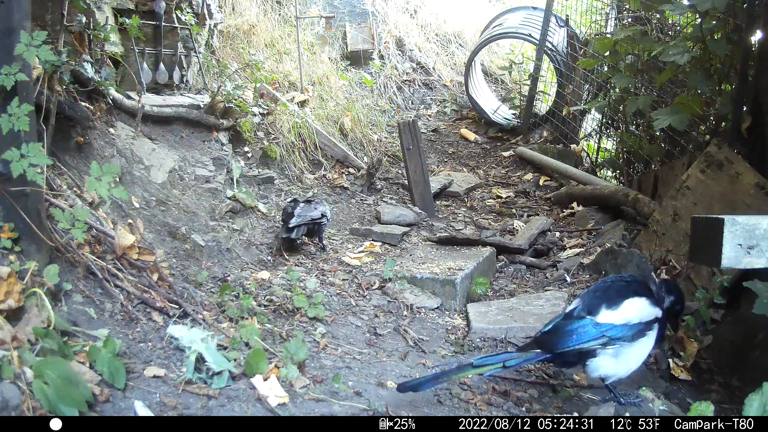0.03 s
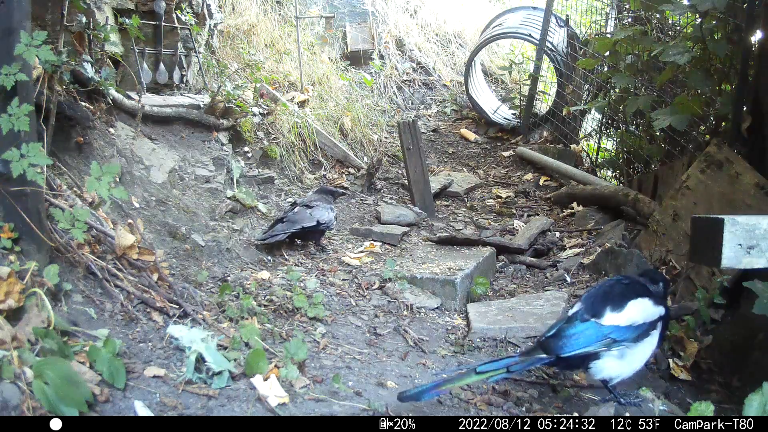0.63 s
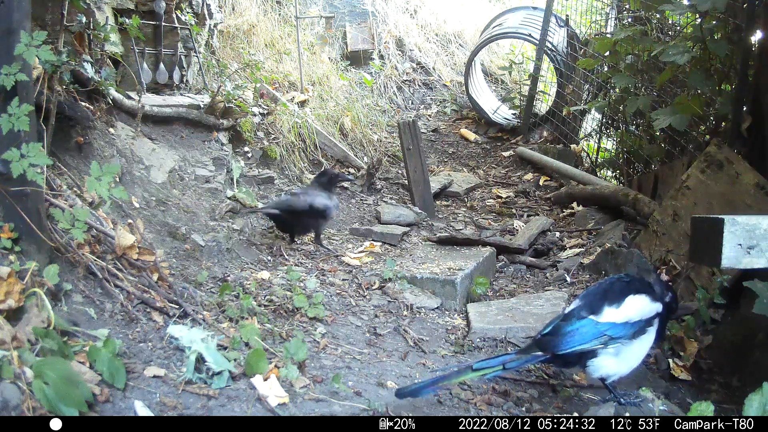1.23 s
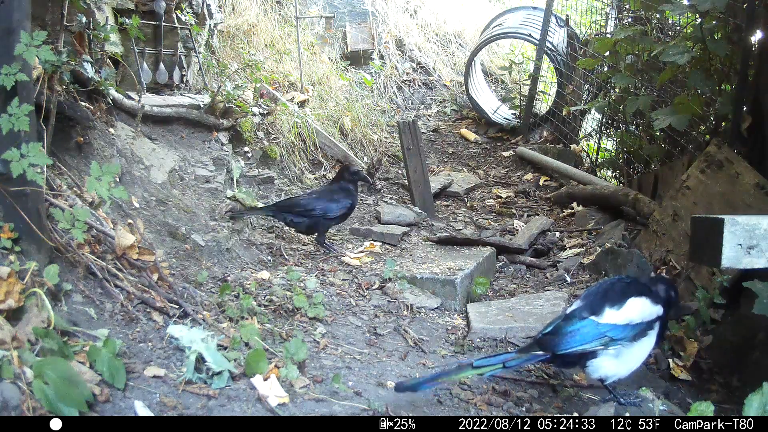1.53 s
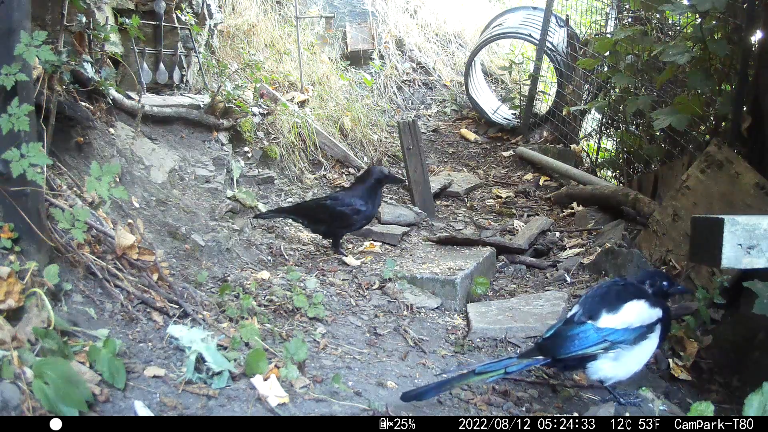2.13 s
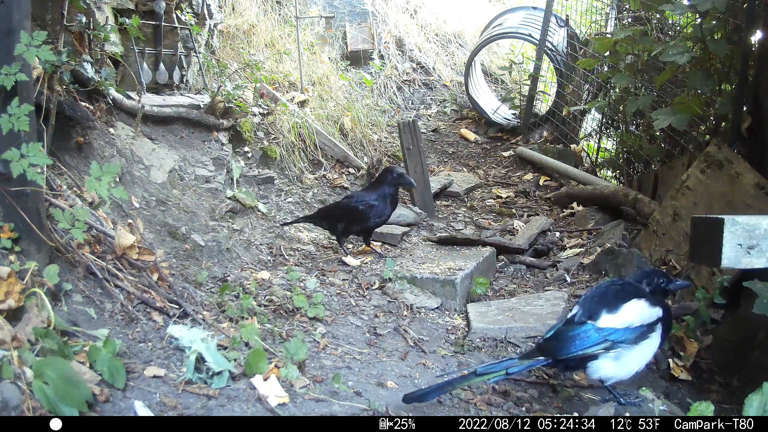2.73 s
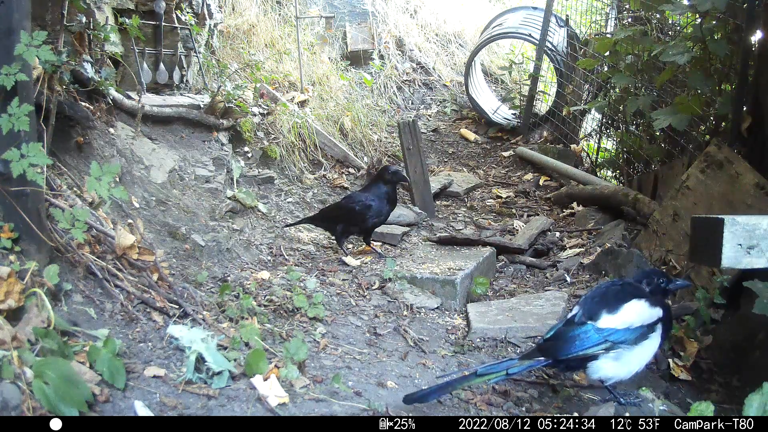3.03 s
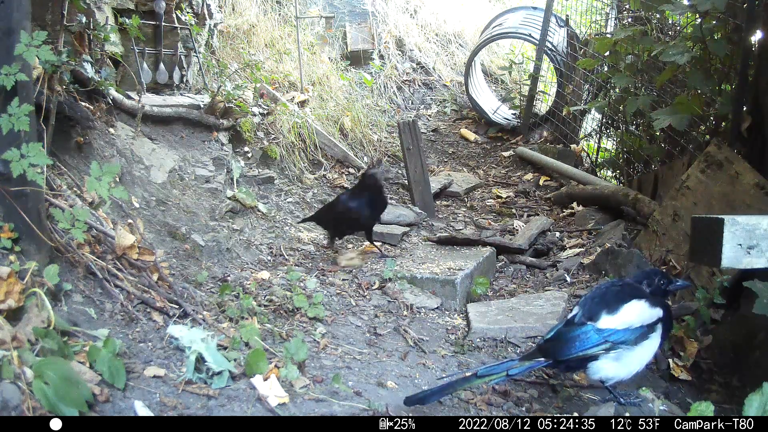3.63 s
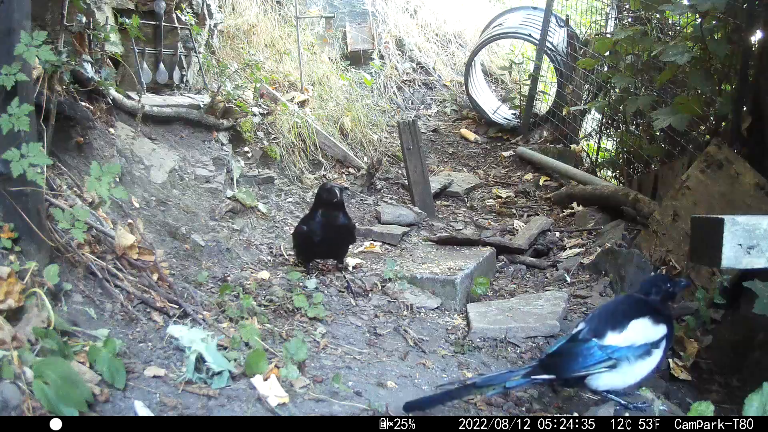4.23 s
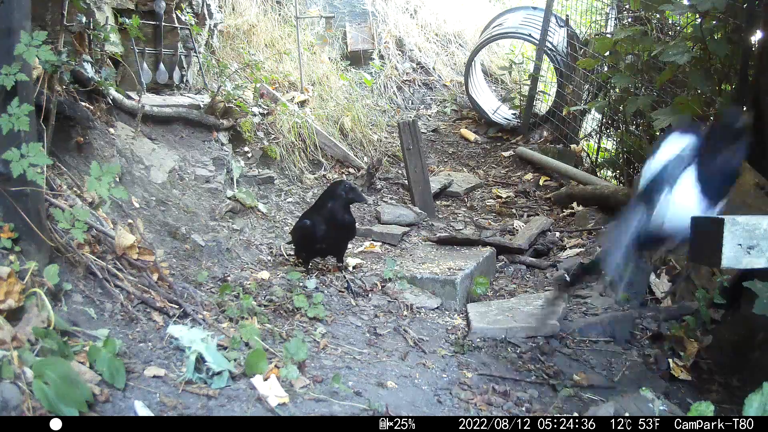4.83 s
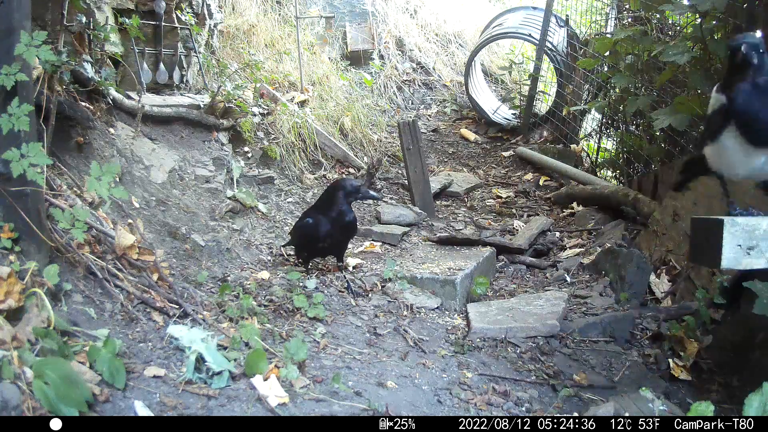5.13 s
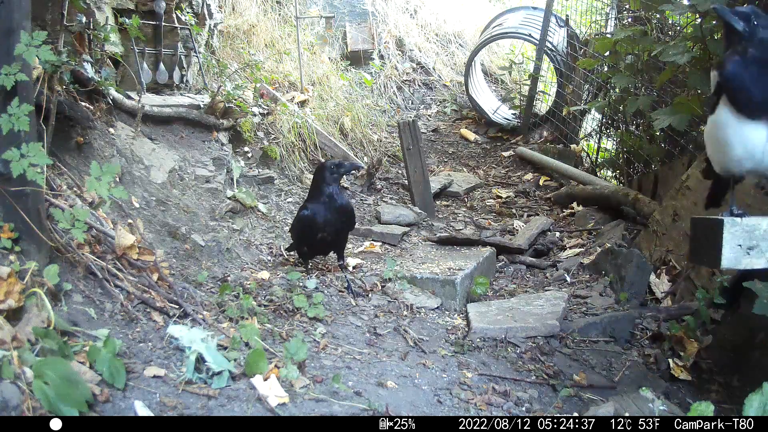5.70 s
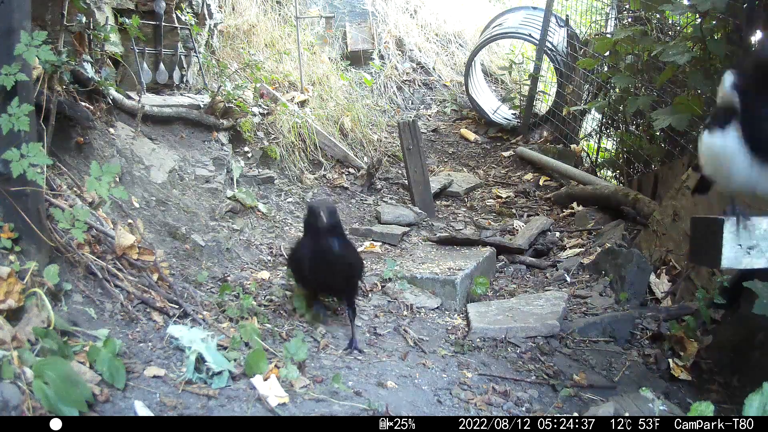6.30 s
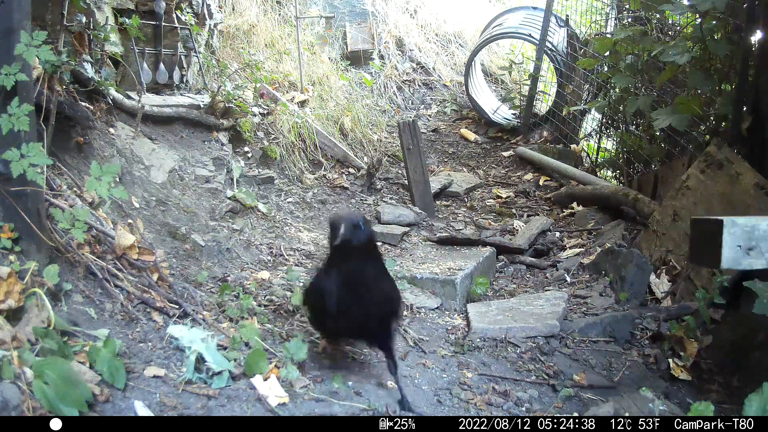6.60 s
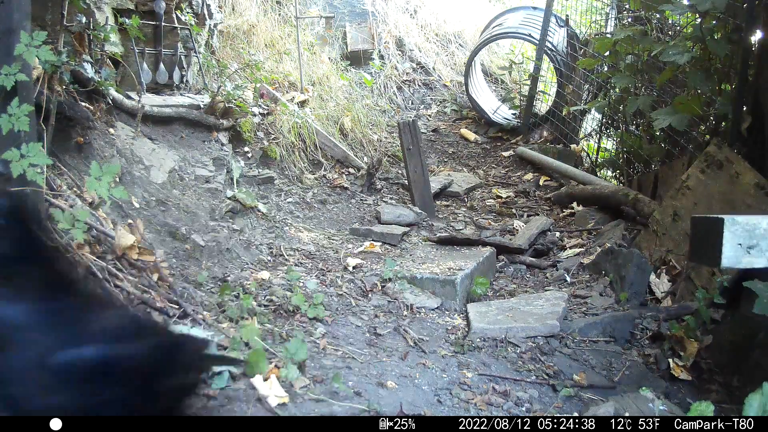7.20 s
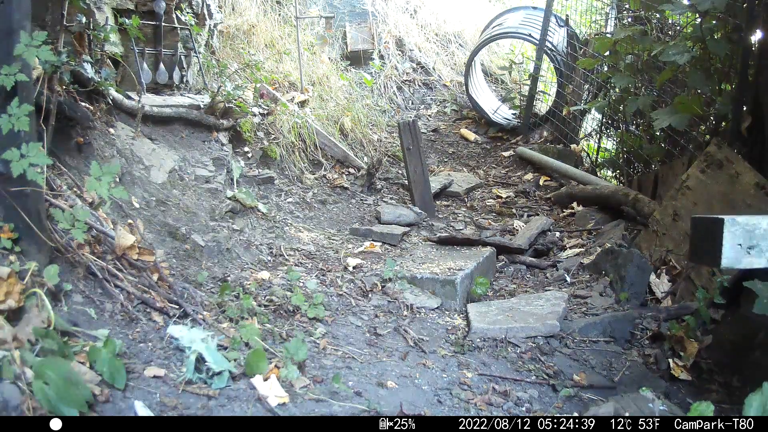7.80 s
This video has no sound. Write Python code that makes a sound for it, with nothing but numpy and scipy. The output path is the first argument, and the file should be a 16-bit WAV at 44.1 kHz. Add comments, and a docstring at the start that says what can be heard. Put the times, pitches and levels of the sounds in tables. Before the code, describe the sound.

Distant traffic hums steadily behind a garden where a few birds give quiet, brief falling calls between light pecks, steps and leaf scuffs. The hum swells once, then three raspy squawks ring off the walls. Claws click closer and closer until a sharp twig crack sets off the loudest sound, a quick flurry of wingbeats very near the microphone, buffeting it with air and ending on a short squawk.

```python
"""Magpies and a crow call and forage in a walled garden: short falling notes, then three harsh squawks.
Each voice is a buzzing tone from the bird's voice box (the syrinx), shaped by its throat.
Claws and beaks tick, twigs snap and feet scuff in dry leaves. At the end a bird flaps off very close by:
its feathers crackle and puffs of air hit the microphone. Faint birds call far away, and distant
traffic hums under it all."""
import sys
import numpy as np
from scipy import signal
from scipy.fft import rfft, irfft, next_fast_len
from scipy.io import wavfile
from scipy.ndimage import uniform_filter1d

SR = 44100
rng = np.random.default_rng(int(sys.argv[2]) if len(sys.argv) > 2 else 0)


def log_audio(samples):
    """Write samples as a 16-bit WAV file to the path given in sys.argv[1]."""
    # one column per channel
    frames = np.atleast_2d(samples).T
    # limit to full scale, then quantise
    limited = np.clip(frames, -1, 1)
    pcm = np.round(limited * 32767).astype(np.int16)
    wavfile.write(sys.argv[1], SR, pcm)


N = 355049
TIME = np.arange(N) / SR
CUTOFF_HZ = 15900

# Squawking voices; where two overlap, both sides of the syrinx sound. Each row: start, rise time and
# length in seconds, pitch before and after the dive in Hz, dive time in seconds, level in dB,
# seconds until the voice breaks, final roughness from 0 to 1.
SQUAWK_VOICES = [(5.339, 0.13, 0.22, 1563, 1466, 0.038, -38, 0.057, 0.88),
                 (5.393, 0.024, .15, 1730, 1175, 0.047, -41.5, .008, 0.65),
                 (5.718, 0.12, 0.24, 1500, 1557, 0.069, -38.5, 0.056, 0.9),
                 (5.733, 0.073, 0.19, 2225, 1440, 0.055, -40.5, 0.024, 0.46),
                 (6.109, 0.02, 0.13, 2400, 1540, 0.038, -44.5, 0.016, .52),
                 (6.093, 0.022, 0.06, 2520, 2500, 0.097, -46.5, 0.061, 0.3),
                 (6.127, 0.035, 0.18, 1810, 1457, 0.063, -45, 0.011, 0.94),
                 (8.011, 0.0066, 0.054, 2446, 2090, 0.067, -32, .025, 0.46)]
# One throat for each voice above. Each resonance: centre in Hz, half width in Hz, level in dB.
SQUAWK_RESONANCES = [
    [(1500, 1600, -21), (2900, 260, -.5), (4920, 350, -3), (6650, 260, -1), (8600, 990, -7.5)],
    [(2270, 130, -5), (2890, 320, -2.5), (5000, 400, -4.5), (7200, 1600, -7)],
    [(2470, 230, -4.5), (3130, 450, -0.5), (5300, 140, -4), (7100, 820, -7), (9100, 1300, -15)],
    [(1880, 220, -21), (2980, 270, 1), (5130, 180, 2), (7600, 1200, -6)],
    [(2150, 330, -1), (3300, 220, -4), (5600, 220, -5), (7150, 1000, -5)],
    [(2500, 370, 6), (5100, 400, -20)],
    [(2400, 170, 3.5), (3080, 470, 3), (5800, 220, -3), (6800, 460, -2), (8600, 1400, -8)],
    [(2400, 500, 2), (4900, 600, -14)],
]
# Short notes. Each row: start and length in seconds, first pitch in Hz, level in dB, roughness near
# the middle from 0 to 1, brightness in dB per octave, boost of the upper throat resonance in dB.
FALLING_NOTES = [(0.582, 0.054, 1089, -53.5, 0.35, 0.5, -7), (0.941, 0.057, 1075, -49.5, 0.3, 2.5, 7),
                 (1.937, 0.06, 1014, -54, 0.17, -0.5, -1), (3.484, 0.06, 1082, -49.5, 0.28, 0.5, -1),
                 (6.383, 0.048, 1120, -50, 0.3, 2, 2), (6.684, 0.05, 1120, -48.5, 0.26, 1, 2),
                 (7.542, 0.054, 1102, -48, 0.3, 2.5, -4)]
# The throat that shapes those notes. Each row: frequency in Hz, level in dB.
NOTE_THROAT_COLOUR = [(500, -38), (900, -6.5), (1060, 0), (1350, -16), (1900, 2.5), (2150, -4.5),
                      (2500, -22), (2880, -9.5), (3300, -14), (4200, -17.5), (5000, -11), (6000, -16.5),
                      (7000, -16), (11000, -30)]

# Wing strokes; the first only brushes past. Each row: peak time and half width in seconds, level in dB.
WING_STROKES = [(7.135, 0.023, -45.5), (7.699, 0.0085, -26), (7.783, 0.028, -29.5), (7.8135, 0.007, -20.5),
                (7.836, 0.0038, -29), (7.872, 0.0038, -24.5), (7.89, 0.012, -28.5), (7.917, .006, -26),
                (7.943, 0.0093, -26), (7.975, 0.01, -22), (8.015, 0.028, -31)]
# The tone of rustling feathers. Each row: frequency in Hz, level in dB.
FEATHER_TONE = [(240, -44), (400, -3.5), (826, -4), (1040, -1), (1160, -6), (1290, -4), (2840, -2.5),
                (3900, -1.5), (4280, 4.5), (4750, -1), (5250, 1.5), (5800, -1), (8500, 0), (9300, 0),
                (10000, -4), (13300, -6), (16000, -15)]
# Stiff quills snapping against each other. Each row: start in seconds, peak in dB, centre in Hz.
QUILL_SNAPS = [(7.7295, -17, 7500), (7.7495, -14, 11500), (7.777, -7, 11000), (7.782, -16, 10000),
               (7.7932, -1.5, 9100), (7.818, -14, 4870), (7.834, -14, 11000), (7.8723, -5, 4800),
               (7.893, -16, 9000), (7.9293, -4, 8100), (7.931, -6.5, 4350), (7.939, -6, 7000),
               (7.9422, -7, 9800), (7.9435, -4, 5000), (8.015, -8, 7600)]
# Air from the wings. Each row: peak time and half width in seconds, level in dB, top frequency in Hz.
AIR_PUFFS = [(7.807, 0.0074, -20, 100), (7.836, 0.014, -21.5, 95), (7.841, 0.0032, -21, 300),
             (7.914, 0.015, -33.5, 169), (7.965, 0.005, -24, 305), (7.99, 0.023, -35.5, 80.5)]

# Claws and beaks on twigs and stone. Each row: start in seconds, level in dB, centre in Hz,
# fade time in seconds.
CLAW_TICKS = [(.311, -41.5, 5800, 0.018), (1.476, -45.5, 6360, .0046), (1.653, -53, 4020, .004),
              (3.646, -47, 6000, 0.0032), (3.822, -46.5, 6600, .0044), (3.866, -48, 3770, .0037),
              (3.937, -45, 10500, .004), (3.964, -42, 8500, .0059), (4.100, -45, 6450, 0.0047),
              (4.202, -45, 5540, .003), (4.441, -47.5, 3500, 0.0038), (4.964, -46.5, 4640, 0.014),
              (5.148, -47.5, 3870, 0.0052), (5.340, -40, 3700, 0.0021), (6.522, -44, 4100, .004),
              (6.7355, -37, 5460, .003), (6.7372, -25, 1470, 0.007), (6.7385, -22.5, 3900, 0.0024),
              (6.749, -40, 6500, .0012), (6.754, -33, 6200, .0012), (6.794, -39, 6000, 0.0057),
              (6.890, -31.5, 4230, .004), (6.896, -29.5, 6200, 0.011), (6.966, -44, 5000, .003),
              (6.972, -34.5, 5000, 0.009), (7.098, -35, 3970, .0048), (7.165, -27, 5600, 0.0048),
              (7.269, -29, 4870, .0013), (7.278, -35, 4870, 0.01), (7.3075, -19.5, 5100, 0.0014),
              (7.3094, -15.5, 5700, 0.00075), (7.315, -28.5, 8500, 0.003), (7.4264, -26.5, 4770, 0.0044),
              (7.4385, -24, 4800, 0.00054), (7.4404, -22.5, 5600, 0.0011), (7.455, -27, 4520, 0.00096),
              (7.479, -34, 4900, .00083), (7.487, -25, 5100, 0.00082), (7.495, -33, 5200, 0.00092),
              (7.535, -29, 5100, 0.00097), (7.556, -35, 5000, 0.0009), (7.6864, -1.5, 5000, 0.0015)]
# Brittle twigs. Each row: start in seconds, level in dB, pitch in Hz, rise and fade times in seconds.
TWIG_SNAPS = [(4.0985, -42, 4760, .001, 0.0046), (7.3088, -26, 5100, 0.00079, 0.00069),
              (7.4398, -24, 5000, 0.00044, 0.00079), (7.6865, -1.5, 5250, 0.00071, 0.00032),
              (7.6865, -17, 1420, 0.00076, 0.00082)]
# The ringing tones of a chip of stone. Each row: pitch in Hz, level in dB, seconds to fade by 60 dB.
STONE_TONES = [(780, -8, 0.016), (1820, -18.5, 0.049), (2060, -21, .04), (3800, 3, 0.0057),
               (6960, 1.5, 0.0068), (8200, -19, 0.017)]
# The crow's steps on a piece of wood. Each row: start in seconds, level in dB.
WOOD_STEPS = [(0.309, -54), (3.80, -53), (3.894, -44.5), (3.942, -52), (4.004, -50), (4.059, -49.5),
              (4.099, -52.5), (4.133, -43), (4.272, -54), (4.442, -54)]
# The ringing tones of that wood. Each row: pitch in Hz, level in dB, seconds to fade by 60 dB.
WOOD_TONES = [(1120, 1, 0.031), (1500, 1, 0.022), (1795, 0.5, 0.029), (2900, -1, 0.017), (3600, -7, 0.038),
              (4800, -4.5, .034), (6900, -5, .012)]
# Heavier landings. Each row: start in seconds, level in dB, top frequency in Hz, fade time in seconds.
LANDINGS = [(0.308, -45.5, 547, 0.012), (6.737, -32.5, 410, 0.021)]
# Feet in dry leaves. Each row: start and length in seconds, level in dB, boost of the top treble in dB.
LEAF_SCUFFS = [(1.873, 0.054, -59.5, 3), (3.057, 0.046, -65, 1), (3.654, 0.51, -66.5, 8),
               (3.704, 0.048, -55, 3), (3.9, 0.075, -61, 12), (4.04, 0.023, -63, 3),
               (6.332, 0.061, -59, 10), (6.616, 0.77, -62.5, 9), (7.076, 0.073, -54, 13),
               (7.614, 0.11, -36, -21)]
# The tone of the scuffing rustle, with its top treble turned down. Each row: frequency in Hz, level in dB.
SCUFF_TONE = [(300, -21), (1000, 2.5), (1800, 0), (2500, -0.5), (3700, 5.5), (5000, -1.5), (7700, 3.5),
              (10000, -11), (16000, -22)]

# A small bird far away. Each row: start and length in seconds, first pitch in Hz, level in dB.
FAR_WHISTLES = [(4.158, 0.26, 4340, -74), (4.42, 0.19, 4080, -76), (4.66, 0.2, 4060, -77)]
# Hoarse calls beyond the wall. Each row: start and length in seconds, level in dB, middle pitch in Hz.
CAWS = [(2.635, 0.053, -71.5, 1156), (2.96, 0.18, -72, 2690), (3.14, .05, -70, 1550),
        (3.26, .06, -71, 1540), (4.722, 0.19, -68, 2200)]
# The throat that shapes those calls. Each row: multiple of the middle pitch, level in dB.
CAW_THROAT = [(.4, -24), (.75, -4), (1, -5), (1.3, -9), (3, -17)]
# The tones of the traffic and of the hiss. Each row: frequency in Hz, level in dB.
TRAFFIC_TONE = [(15, -69), (25, -13), (86, -6), (107, -4.5), (177, -6), (216, 1), (262, -4.5), (350, -3.5),
                (426, -16.5), (525, -20.5), (560, -27.5), (659, -25), (840, -28), (1040, -34.5),
                (1200, -54), (1560, -66), (2640, -120)]
HISS_TONE = [(530, -16), (900, -8), (1160, -0.5), (1570, -3), (3380, -7.5), (4010, -7), (5100, -6.5),
             (14200, -10), (16000, -17)]


def squawks(clean_roughness=0.12, break_width_s=0.0116, sag_hz_per_s=900, rattle_hz=115.1):
    """Each voice opens as an almost clean whistle, then breaks into a sputtering rasp."""
    out = np.zeros(N)
    for row, throat in zip(SQUAWK_VOICES, SQUAWK_RESONANCES):
        start, attack, length, first_hz, last_hz, dive_s, db, break_s, roughness = row
        age = np.arange(int(length * SR)) / SR
        fade = np.clip((length - age) / (0.52 * length), 0, 1) ** 1.24
        swell = np.clip(age / attack, 0, 1) * fade
        dive = np.exp(-(age / dive_s) ** 1.6)   # lingers, then moves fast
        pitch_hz = last_hz + (first_hz - last_hz) * dive - sag_hz_per_s * age
        broken = 1 / (1 + np.exp((break_s - age) / break_width_s))
        rough = clean_roughness + (roughness - clean_roughness) * broken
        voice = syrinx(pitch_hz, rough, jitter=.085 * rough, wobble=.055, rasp=.28, purity=1.4)
        rattle = np.cos(phase_of(rattle_hz * (1 + 0.28 * low_noise(110, len(age)))))
        voice *= 1 + .55 * rough * rattle
        add(out, start, from_db(db) * swell * even(sinking_throat(voice, throat), size=600))
    return out


def notes(fall_share=.24, hoarseness=0.59, upper_hz=2900, upper_width_hz=320):
    """Each short note swells and fades while its pitch slides down and the voice frays."""
    out = np.zeros(N)
    hz, throat_db = np.transpose(NOTE_THROAT_COLOUR)
    for start, length, first_hz, db, roughness, bright_db, boost_db in FALLING_NOTES:
        progress = np.linspace(0, 1, round(length * SR))
        pitch_hz = first_hz * (1 - fall_share * progress ** 1.55)
        rough = roughness * (.4 + 1.3 * progress)
        voice = syrinx(pitch_hz, rough, jitter=.09, wobble=.06, rasp=.7, purity=.2)
        voice *= 1 + hoarseness * (.4 + progress) * low_noise(170, len(progress))
        tilt_db = bright_db * np.log2(hz / first_hz)
        upper_db = boost_db / (1 + ((hz - upper_hz) / upper_width_hz) ** 2)
        voice = colour(voice, np.c_[hz, throat_db + tilt_db + upper_db])
        add(out, start, from_db(db) * np.sin(np.pi * progress) * even(voice, size=600))
    return out


def syrinx(pitch_hz, rough, jitter, wobble, rasp, purity):
    """The voice box makes a stack of overtones; the rougher it is, the brighter, shakier and airier."""
    n = len(pitch_hz)
    quiver = (.007 + jitter * rough) * low_noise(450, n)
    lurch = wobble * rough * low_noise(90, n)
    phase = phase_of(pitch_hz * (1 + quiver + lurch))
    slope = purity * (1 - np.clip(rough, 0, 1))
    stack = sum(np.cos(k * phase) / k ** slope * (k * pitch_hz < CUTOFF_HZ) for k in range(1, 11)) / 2
    doubling = 0.18 * np.cos(phase / 2)   # every other cycle is stronger
    strength = 1 + rough * (0.89 * low_noise(600, n) + doubling)
    air = rasp * rough * rng.standard_normal(n) * (1 + np.cos(phase))   # one rasp in each cycle
    return stack * strength + air


def sinking_throat(voice, throat, fall_share=0.09, wander=.035, valley_db=-28, shapes=12):
    """The throat's resonances waver and slide down as it blends from one shape to the next."""
    out, hz = 0, np.geomspace(200, CUTOFF_HZ, 200)
    # a small beak lets out neither bass nor the highest treble
    beak = 1 / np.hypot(1, (hz / 11000) ** 5) / np.hypot(1, (1000 / hz) ** 2)
    stage = np.linspace(0, shapes - 1, len(voice))
    for k, sink in enumerate(fall_share * np.linspace(.5, -.5, shapes)):
        shifts = sink + wander * rng.standard_normal(len(throat))
        gain = from_db(valley_db)
        for (centre, width, db), shift in zip(throat, shifts):
            moved_hz = centre * (1 + shift * min(1, (3000 / centre) ** 2))   # low ones move most
            gain = gain + from_db(db) / (1 + ((hz - moved_hz) / width) ** 2)
        blend = np.maximum(1 - np.abs(stage - k), 0)
        out += blend * colour(voice, np.c_[hz, 20 * np.log10(gain * beak)])
    return out


def wings(flutter_db=-33.5, takeoff_s=7.69, rise_s=0.09):
    """Each stroke is a swell of feather noise; after take-off the feathers also rustle in between."""
    flutter = from_db(flutter_db) * np.clip((TIME - takeoff_s) / rise_s, 0, 1)
    power = flutter ** 2 + sum((from_db(db) * bell(s, width)) ** 2 for s, width, db in WING_STROKES)
    return np.sqrt(power) * rustle(FEATHER_TONE, grains_per_s=7000, swish=1.0)


def quills(barbs_per_s=9000, barb_db=-4, fade_s=0.0013, broad_db=-9):
    """A quill snaps and drags a dying run of tiny barb slips after it, coloured by the shaft."""
    out, age = np.zeros(N), np.arange(512) / SR
    grid = (len(QUILL_SNAPS), len(age))
    for (start, db, hz), luck, size in zip(QUILL_SNAPS, rng.random(grid), rng.standard_normal(grid)):
        slips = from_db(barb_db) * size * (luck < barbs_per_s / SR) * np.exp(-age / fade_s)
        slips[0] = 1   # the snap itself
        shaft = signal.lfilter(*signal.iirpeak(hz, Q=2.4, fs=SR), slips)
        snap = shaft + from_db(broad_db) * np.diff(slips, prepend=0) / 2
        add(out, start, from_db(db) * snap / np.abs(snap).max())
    return out


def puffs():
    """The wings push lumps of swirling air over the microphone."""
    return sum(from_db(db) * bell(s, width) * even(low_noise(hz, order=5), size=800)
               for s, width, db, hz in AIR_PUFFS)


def ticks(band_ratio=1.42, broad_db=-8.5, crumble_db=-20.5, crumble_s=0.011, attack_s=0.0001):
    """A claw or beak strikes: a short crack, strongest in one band, with a crumbling tail."""
    out, age = np.zeros(N), np.arange(4096) / SR
    for start, db, hz, fade_s in CLAW_TICKS:
        grit = rng.standard_normal((2, len(age)))
        band = filtered(grit[0], 4, [hz / band_ratio, min(hz * band_ratio, CUTOFF_HZ)], "band")
        broad = filtered(grit[1], 4, [min(800, hz / 2), min(hz * np.sqrt(2), CUTOFF_HZ)], "band")
        crack = even(band + from_db(broad_db) * broad, size=48)
        fade = np.exp(-np.maximum(age - attack_s, 0) / fade_s)
        crumble = from_db(crumble_db) * np.exp(-age / crumble_s)
        add(out, start, from_db(db) * crack * np.minimum(age / attack_s, 1) * (fade + crumble) / 2)
    return out


def twigs():
    """A twig cracks within a millisecond and rings very briefly at one pitch."""
    out, age = np.zeros(N), np.arange(SR // 20) / SR
    for start, db, hz, rise_s, fade_s in TWIG_SNAPS:
        shape = np.minimum(age / rise_s, 1) ** 2 * np.exp(-np.maximum(age - rise_s, 0) / fade_s)
        add(out, start, from_db(db) * shape * np.sin(2 * np.pi * hz * age))
    return out


def peck(start_s=.3089, level_db=-29, attack_s=0.00046):
    """One hard peck makes a chip of stone clink."""
    out, age = np.zeros(N), np.arange(SR // 10) / SR
    clink = sum(ring(age, hz, level_db + db, ring_s) for hz, db, ring_s in STONE_TONES)
    add(out, start_s, clink * np.minimum(age / attack_s, 1))
    return out


def knocks(uneven_db=2, scrape_db=-7, scrape_s=0.0094, attack_s=0.0034):
    """Each step scrapes the wood and loads it differently, so it rings with new pitches and strengths."""
    out, age = np.zeros(N), np.arange(4096) / SR
    chances = rng.standard_normal((len(WOOD_STEPS), len(WOOD_TONES), 2))
    for (start, db), chance in zip(WOOD_STEPS, chances):
        scrape = rms_one(filtered(rng.standard_normal(len(age)), 2, [900, 5000], "band"))
        step = from_db(scrape_db) * np.exp(-age / scrape_s) * scrape
        for (hz, tone_db, ring_s), (luck, load) in zip(WOOD_TONES, chance):
            step += ring(age, hz * (1 + .025 * load), tone_db + uneven_db * luck, ring_s)
        add(out, start, from_db(db) * step * np.minimum(age / attack_s, 1))
    return out


def thuds():
    """Soft ground swallows a landing in a few dull cycles."""
    out = np.zeros(N)
    for start, db, hz, fade_s in LANDINGS:
        fade = (TIME > start) * np.exp(-np.abs(TIME - start) / fade_s)
        out += from_db(db) * fade * even(low_noise(hz, order=4), size=400)
    return out


def scuffs(attack_s=0.0024, settle_s=0.0074, crisp_above_hz=11100):
    """Leaves rustle as long as a foot drags, then settle; some scuffs are crisp on top."""
    scuffing = rustle(SCUFF_TONE, grains_per_s=1500, swish=0.6)
    body, top = (filtered(scuffing, 3, crisp_above_hz, kind) for kind in ("low", "high"))
    out = np.zeros(N)
    for start, length, db, crisp_db in LEAF_SCUFFS:
        rise = np.clip((TIME - start) / attack_s, 0, 1)
        settle = np.exp(-np.clip((TIME - start - length) / settle_s, 0, 20))
        out += from_db(db) * rise * settle * (body + from_db(crisp_db) * top)
    return out


def rustle(tone, grains_per_s, swish, spread_db=2.8, bands=10):
    """Dry surfaces slip over each other: tiny snaps of many sizes and pitches on a smooth swish."""
    sizes = from_db(spread_db * np.minimum(rng.exponential(1, N), 4)) * rng.choice([-1, 1], N)
    clicks = sizes * (rng.random(N) < grains_per_s / SR)
    band_of_click = rng.integers(0, bands, N)
    snaps = sum(signal.lfilter(*signal.iirpeak(hz, Q=4.4, fs=SR), clicks * (band_of_click == k) + 1e-18)
                for k, hz in enumerate(np.geomspace(1200, 14000, bands)))
    return even(colour(rms_one(snaps) + swish * rng.standard_normal(N), tone), size=600)


def far_whistles(sag_hz_per_s=600):
    """A small bird gives three thin, wavering whistles that sink a little."""
    out, waver = np.zeros(N), 1 + 0.014 * low_noise(70)
    for start, length, hz, db in FAR_WHISTLES:
        age = np.clip(TIME - start, 0, length)
        pitch_hz = (hz - sag_hz_per_s * age) * waver
        out += from_db(db) * np.sin(np.pi * age / length) * np.sin(phase_of(pitch_hz))
    return out


def far_caws(fall_share=0.2):
    """Rough voices give faint, falling calls beyond the wall."""
    out = np.zeros(N)
    for start, length, db, hz in CAWS:
        progress = np.linspace(0, 1, round(length * SR))
        pitch_hz = hz * (1 + fall_share * (.5 - progress))
        voice = syrinx(pitch_hz, rough=.8, jitter=0.049, wobble=.1, rasp=.7, purity=0.94)
        throat = [(multiple * hz, level) for multiple, level in CAW_THROAT]
        add(out, start, from_db(db) * np.sin(np.pi * progress) * rms_one(colour(voice, throat)))
    return out


def traffic(steady_db=-46, vehicle_db=-45, vehicle_s=4.83):
    """Distant traffic hums steadily and swells once as a vehicle goes by."""
    level = np.hypot(from_db(steady_db), from_db(vehicle_db) * bell(vehicle_s, half_width_s=0.59))
    return level * rms_one(colour(rng.standard_normal(N), TRAFFIC_TONE))


def hiss(level_db=-65):
    """A faint, even hiss lies behind everything."""
    return from_db(level_db) * rms_one(colour(rng.standard_normal(N), HISS_TONE))


def garden(x, echo_db, ring_s=0.3, first_echo_s=0.0054, dull_hz=5000):
    """Walls and shrubs throw back scattered, duller echoes."""
    age = np.arange(SR // 2) / SR
    echoes = rng.standard_normal(len(age)) ** 3 * from_db(-60 * age / ring_s) * (age > first_echo_s)
    echoes = filtered(echoes / np.linalg.norm(echoes), 1, dull_hz, "low")
    return x + from_db(echo_db) * signal.fftconvolve(x, echoes)[:N]


def from_db(db):
    """Turn decibels into a number to multiply by."""
    return 10 ** (np.asarray(db) / 20)


def rms_one(x):
    """Scale a sound so that its average level (rms) is 1."""
    return x / np.sqrt(np.mean(x ** 2) + 1e-20)


def even(x, size):
    """Hold the level near 1 over every stretch of size samples."""
    return x / np.sqrt(np.abs(uniform_filter1d(x * x, size)) + 1e-9)


def filtered(x, order, hz, kind):
    """Keep the lows, the highs or a band; a higher order cuts more steeply."""
    return signal.sosfilt(signal.butter(order, hz, kind, fs=SR, output="sos"), x)


def colour(x, points):
    """Shape the tone of a sound to follow rows of frequency in Hz and level in dB."""
    size = 2 * next_fast_len(len(x) // 2 + 8192)
    hz, db = np.transpose(points)
    log_hz = np.log(np.arange(size // 2 + 1) * SR / size + 1)
    cepstrum = irfft(np.log(from_db(np.interp(log_hz, np.log(hz), db))))
    # this fold makes the filter ring only after a sound, never before it
    cepstrum[1:size // 2] *= 2
    cepstrum[size // 2 + 1:] = 0
    return irfft(rfft(x, size) * np.exp(rfft(cepstrum)))[:len(x)]


def low_noise(top_hz, size=N, order=3):
    """Noise with a level near 1 and little above top_hz."""
    return rms_one(filtered(rng.standard_normal(size + SR // 2), order, top_hz, "low"))[-size:]


def phase_of(hz):
    """The running angle of a wave whose frequency changes."""
    return 2 * np.pi * np.cumsum(hz) / SR


def ring(age, hz, db, ring_s):
    """A struck tone that fades by 60 dB in ring_s seconds."""
    return from_db(db - 60 * age / ring_s) * np.sin(2 * np.pi * hz * age)


def bell(peak_s, half_width_s):
    """A smooth swell that reaches 1 at peak_s."""
    return np.exp(-((TIME - peak_s) / half_width_s) ** 2 / 2)


def add(out, start_s, sound):
    """Mix a sound into out from start_s on."""
    part = out[round(start_s * SR):][:len(sound)]
    part += sound[:len(part)]


def scene():
    """The calls echo around the garden; the nearby feet and wings hardly echo at all."""
    calls = garden(notes(), echo_db=-3.5, ring_s=.52)
    calls += garden(squawks(), echo_db=-1.0, ring_s=0.32, dull_hz=4270)
    calls += garden(far_whistles() + far_caws(), echo_db=6)
    foraging = ticks() + twigs() + peck() + knocks() + thuds() + scuffs()
    near = garden(foraging + wings() + quills(), echo_db=-17.0)
    return (calls + near + puffs() + traffic() + hiss())[None]


def record(dry):
    """Shed the deepest bass, round off the highest peaks and cut the very top of the treble."""
    trimmed = filtered(dry, 1, 14, "high")
    rounded = .7 * np.tanh(trimmed / .7)
    return signal.sosfilt(signal.ellip(10, .2, 80, CUTOFF_HZ, fs=SR, output="sos"), rounded)


dry = scene()
out = record(dry)
log_audio(out)
```